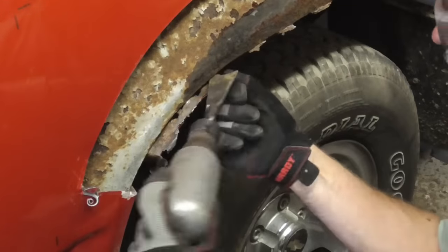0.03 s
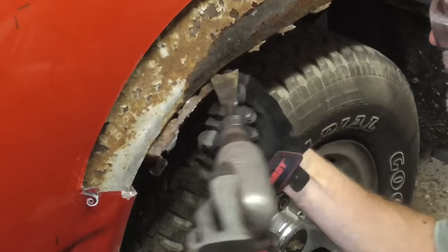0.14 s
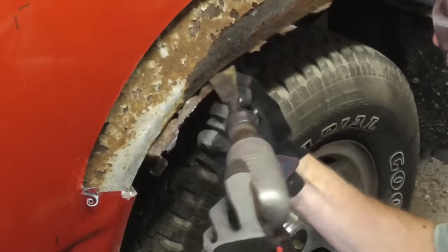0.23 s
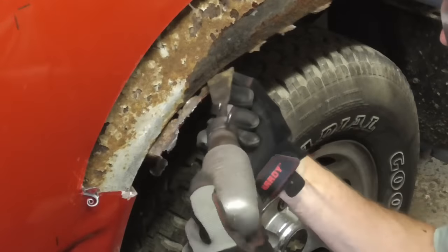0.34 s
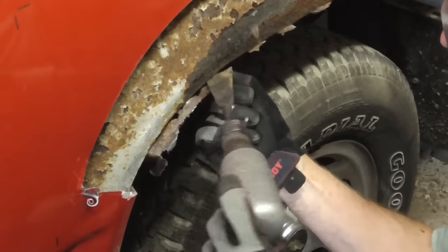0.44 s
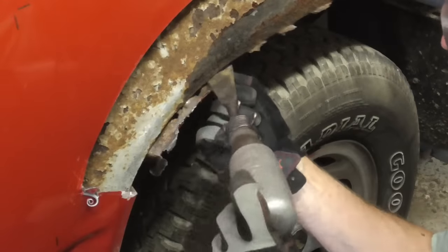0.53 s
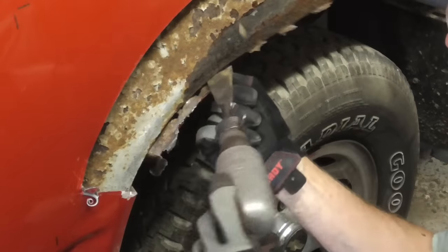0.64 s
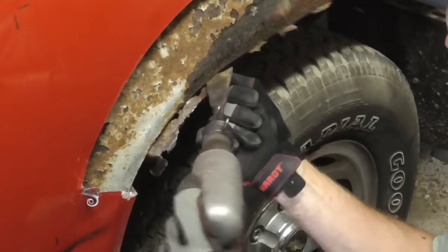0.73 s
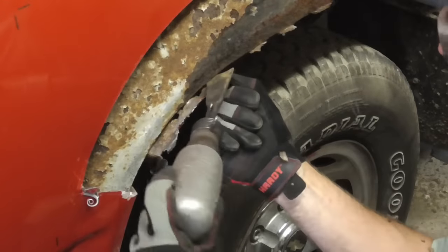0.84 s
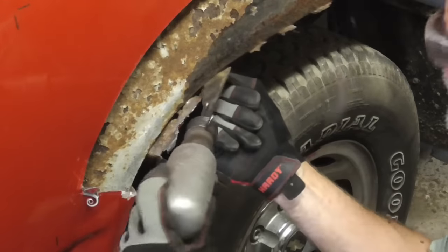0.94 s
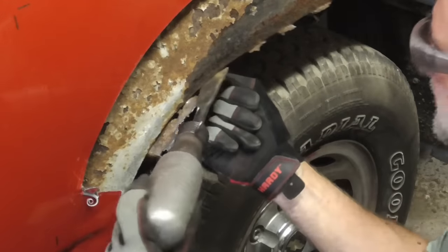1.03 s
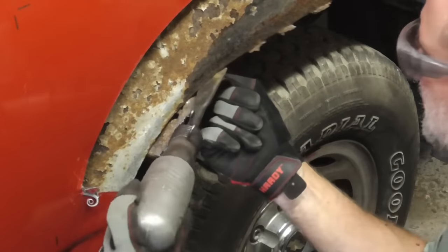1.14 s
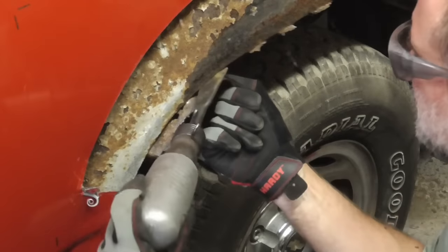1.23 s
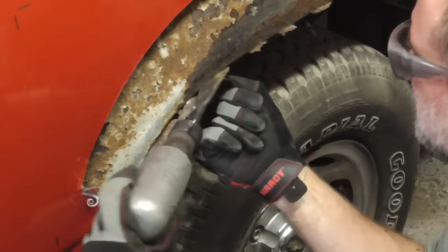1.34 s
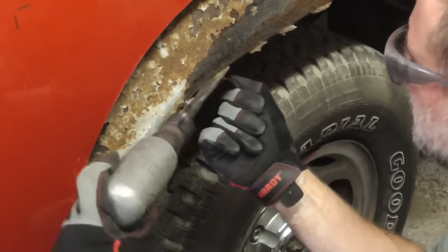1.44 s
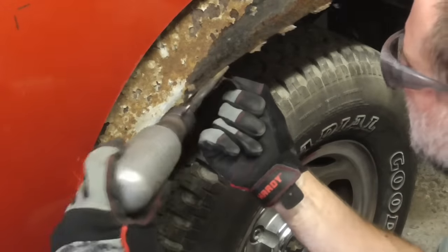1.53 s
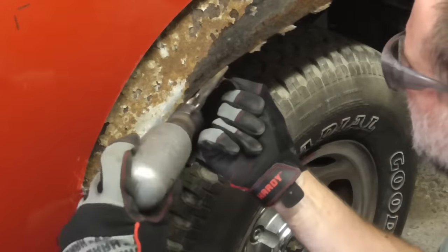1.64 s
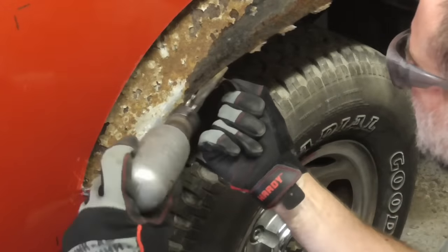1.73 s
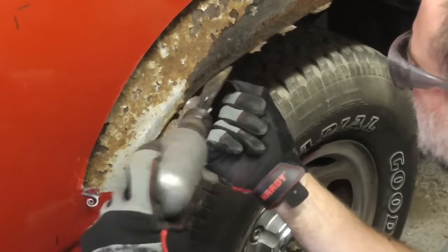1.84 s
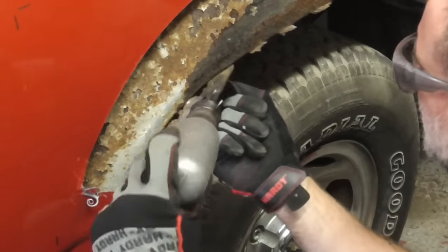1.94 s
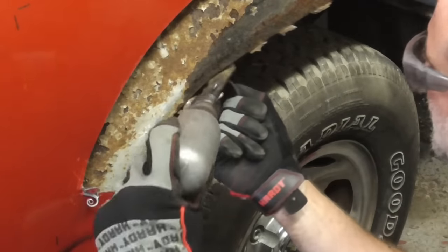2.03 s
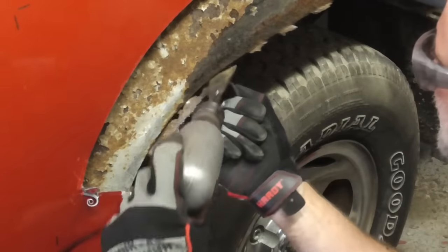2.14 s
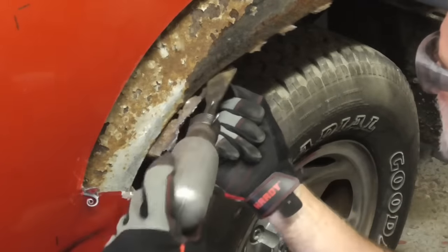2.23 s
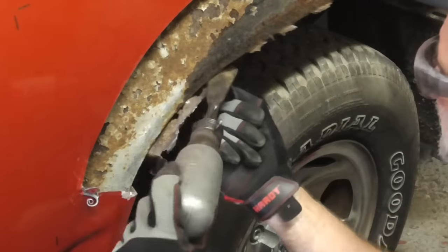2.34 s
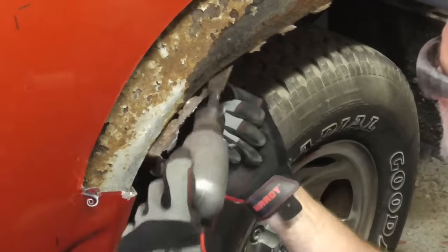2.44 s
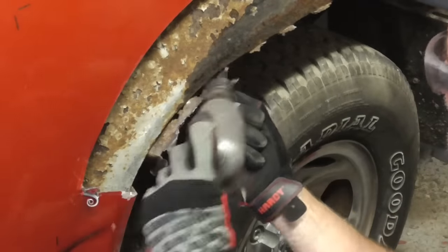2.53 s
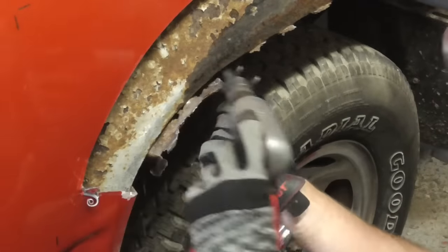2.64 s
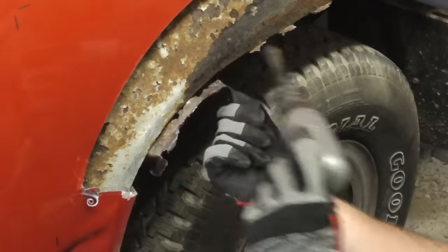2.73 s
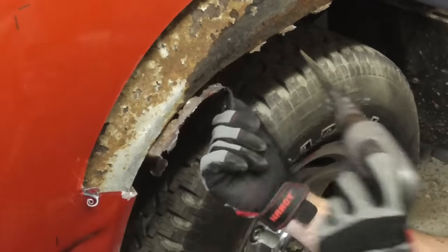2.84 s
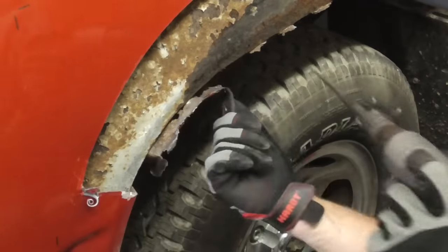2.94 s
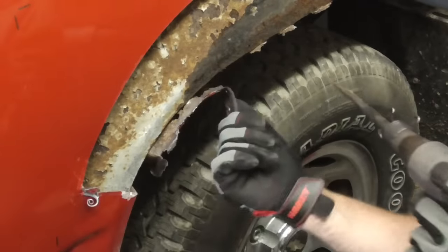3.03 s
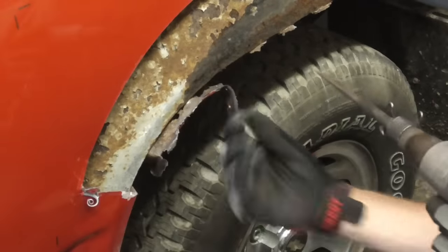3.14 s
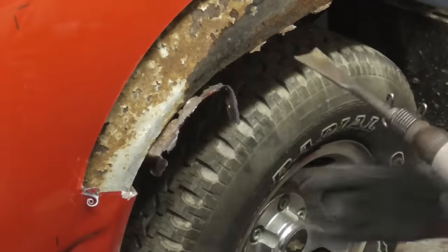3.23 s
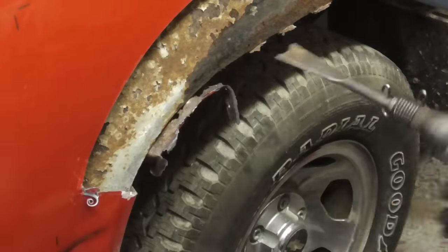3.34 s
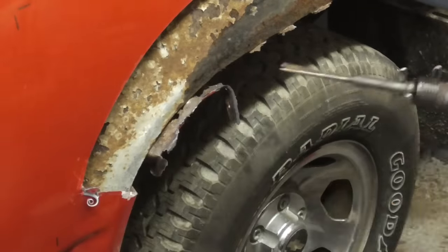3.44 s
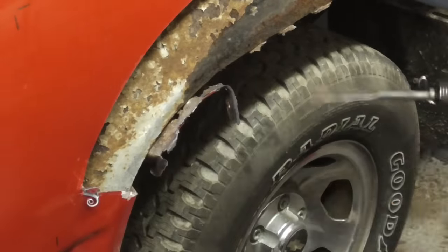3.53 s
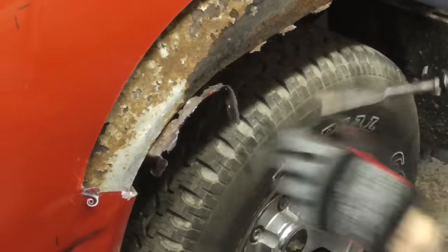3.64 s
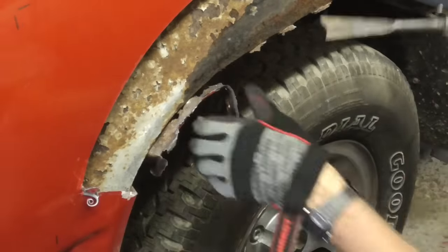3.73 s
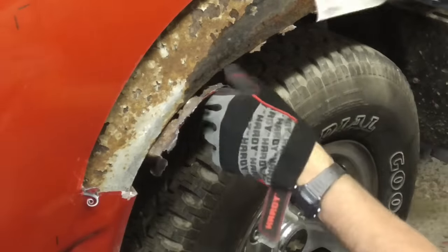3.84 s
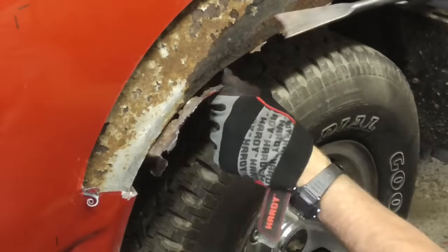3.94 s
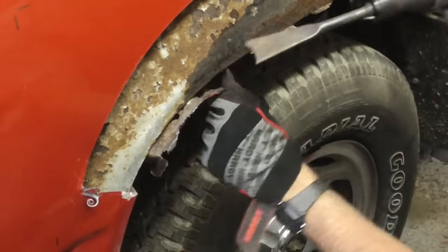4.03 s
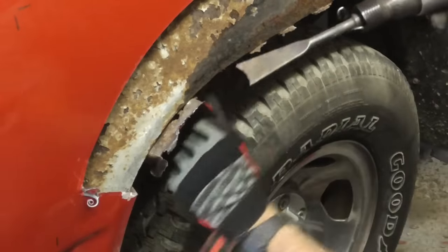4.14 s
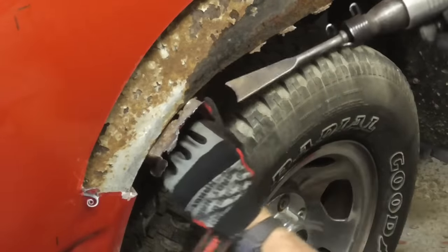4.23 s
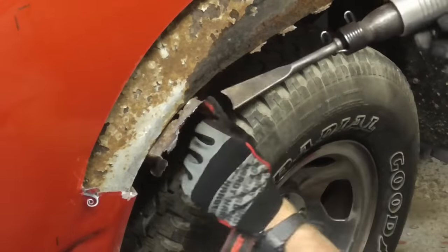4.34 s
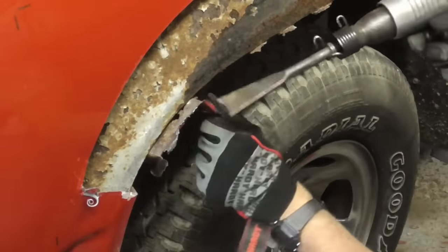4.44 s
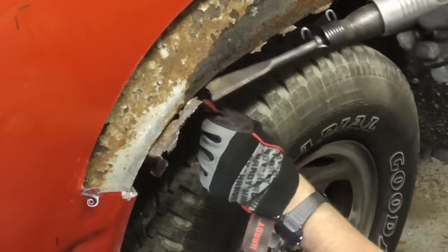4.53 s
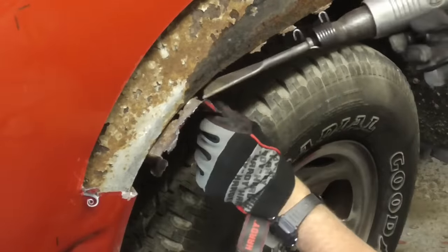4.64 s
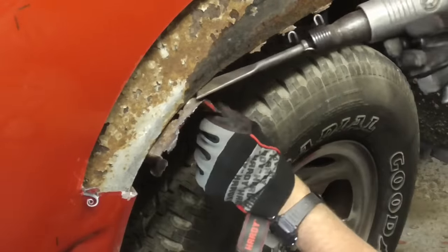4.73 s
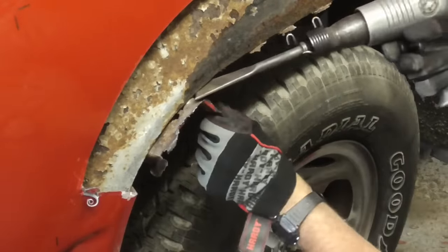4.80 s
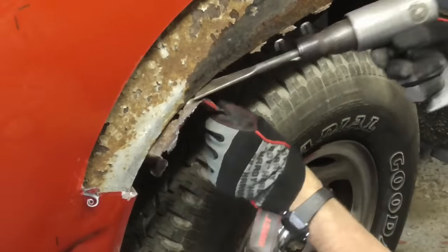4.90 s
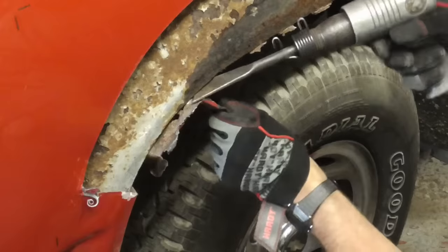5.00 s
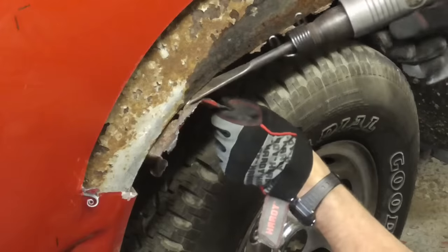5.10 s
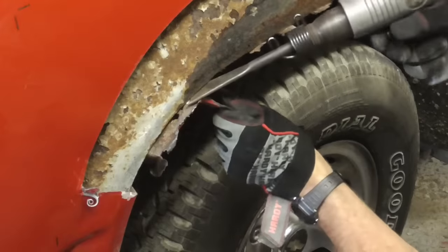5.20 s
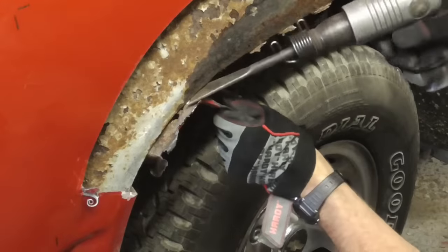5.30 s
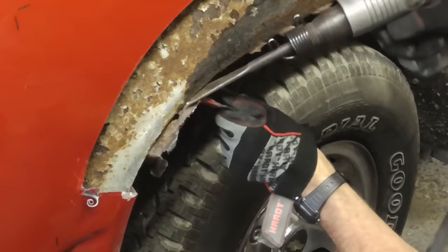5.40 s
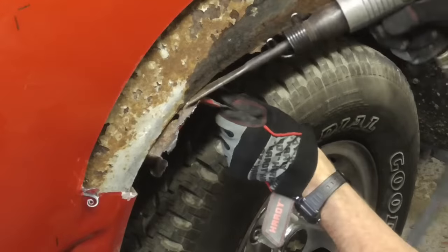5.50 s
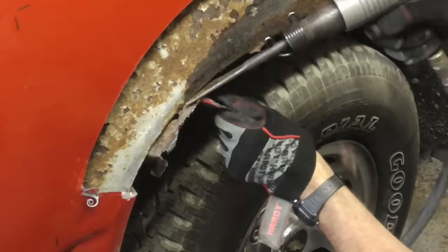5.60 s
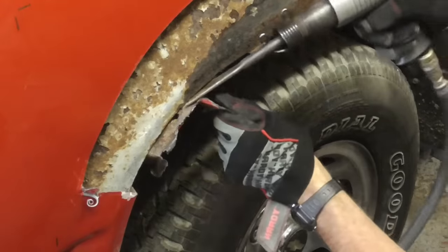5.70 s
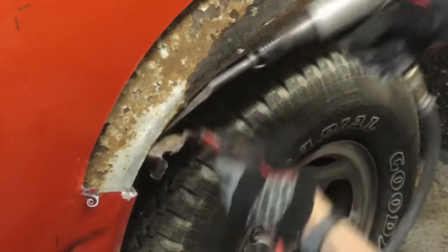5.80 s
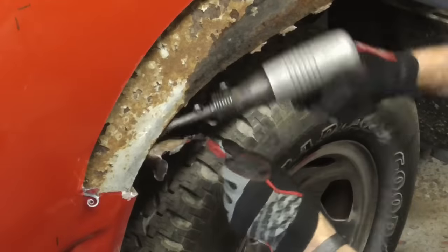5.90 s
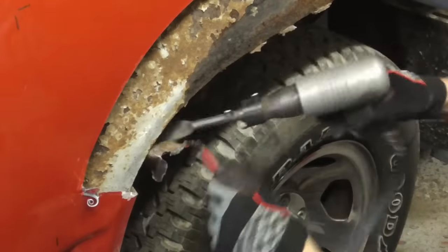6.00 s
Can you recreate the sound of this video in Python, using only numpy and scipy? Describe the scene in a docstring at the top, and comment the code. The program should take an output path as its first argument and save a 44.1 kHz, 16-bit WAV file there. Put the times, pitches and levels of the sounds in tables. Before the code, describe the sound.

Close stereo pickup over a low workshop hum. A compressed-air hammer rattles very fast against hollow, thin sheet metal: short, short, then long, ending in ringing steel. A quieter stretch holds flaky ticks, soft glove-like friction, light chisel clinks and duller panel knocks. A short low groan and air spits lead into a quick burst and a longer one, with walls answering.

```python
"""Soft friction noise rustles in uneven grains and knocks sound on a rusted car wing in a humming workshop.
Two short bursts and a long one follow, about forty blows a second: each vents a hiss from the air hammer,
booms and clangs in the sheet (noise and decaying modes) and rings the chisel (decaying sines).
The chisel breaks free ringing; then rust ticks and scrapes, it clinks and taps, and the levered panel groans.
Two last bursts end it; the walls answer throughout, over low noise and two fuzzy motor tones."""
import sys
import numpy as np
from scipy import signal
from scipy.fft import rfft, irfft, next_fast_len
from scipy.io import wavfile
from scipy.ndimage import uniform_filter1d, minimum_filter1d, map_coordinates

SR = 44100
rng = np.random.default_rng(int(sys.argv[2]) if len(sys.argv) > 2 else 0)


def log_audio(samples):
    """Write samples as a 16-bit WAV file to the path given in sys.argv[1]."""
    # one column per channel
    frames = np.atleast_2d(samples).T
    # limit to full scale, then quantise
    limited = np.clip(frames, -1, 1)
    pcm = np.round(limited * 32767).astype(np.int16)
    wavfile.write(sys.argv[1], SR, pcm)


N = 267246
SPAN = SR // 3  # longest sound of one hit, in samples
OFF_DB = -200


def hammer():
    """Every hit lets out noise, most shake the sheet; driven blows and end-on clinks ring the chisel."""
    hits = all_hits()
    driven = hits["likeness"] > 0
    # the exhaust port stays open for a while after a driven blow
    hold = 1.2 * hits["rise_s"] + .0135 * driven
    air = exhaust(hits, driven, hold)
    metal = sheet(hits, driven, hold)
    rings = hits[driven | (hits["end_on"] > 0)]
    return air + metal + chisel(rings["start_s"], rings["ring_db"], rings["end_on"], rings["contact"])


# trigger pulls, one list each; the pace wanders in the long one: start_s, blows since the first
PULL_STROKES = [
    [(.3895, 0), (.4811, 4), (.5577, 7)],
    [(.697, 0), (.7895, 4), (.8807, 8), (.9496, 11)],
    [(1.071, 0), (1.1933, 5), (1.3192, 10), (1.6795, 24), (2.0311, 38), (2.3959, 53), (2.7499, 67)],
    [(5.271, 0), (5.3462, 3), (5.3944, 5)],
    [(5.5217, 0), (5.5462, 1), (5.9426, 18), (5.9899, 20)],
]
# one row per pull; at its last blow the exhaust weakens and the sheet is let go:
# exhaust_db, likeness of a blow to the last (0-1), last_exhaust_drop_db, last_boom_rise_db
PULL_LEVELS = [(-22, 0.87, 17, 4), (-22, 0.79, 20, 10.5), (-22, 0.79, 2.5, 3.5), (-23, 0.75, 12, 0),
               (-22.5, .95, 1, 3)]
# the cut travels along the wheel arch:
# start_s, boom_db, boom_hz, clang_db, clang_hz, upper_clang_hz, chisel_ring_db
CUT_PATH = [(.41, -15.5, 265, -18.5, 630, 1136, -26), (.53, -19.5, 169, -21, 454, 1147, -34),
            (.72, -15.5, 178, -18, 510, 928, -21), (.84, -16, 184, -19.5, 476, 774, -17),
            (.95, -22, 178, -20, 475, 945, -25), (1.1, -19, 228, -18, 443, 1184, -24),
            (1.28, -16.5, 237, -18.5, 550, 1542, -34), (1.53, -19, 194, -18, 564, 1538, -19),
            (1.701, -20, 234, -18.5, 420, 1506, -27), (1.8, -21, 243, -16.5, 683, 1042, -21),
            (2.07, -21.5, 208, -20, 430, 865, -16.5), (2.4, -23, 211, -21, 420, 703, -13.5),
            (2.55, -26.5, 230, -24.5, 610, 800, -18), (2.759, -28.5, 197, -30.5, 550, 790, -34.5),
            (5.29, -21, 238, -18.5, 484, 748, -34), (5.37, -12.5, 233, -19, 496, 1143, -30),
            (5.42, -24, 210.4, -20, 610, 1214, -34), (5.6, -14, 214, -16.5, 450, 858, -22),
            (5.73, -18, 179, -16.5, 440, 857, -16), (5.9, -19, 173, -16, 440, 860, -16),
            (6, -30, 166, -33, 534, 840, -11)]
AIR_SAG_DB_PER_S, AIR_TREBLE_DB, BLOW_RISE_S = 2, 4, 0.0011
# the chisel seats: the first blows move the sheet this much less
SEAT_S, SEAT_BOOM_DB, SEAT_CLANG_DB = 0.025, 8.5, 4.5
# the chisel breaks free and the trigger eases: the body of the exhaust fades
BREAK_OUT_S, BREAK_OUT_DB_PER_S = 2.45, 15
# in a burst a ring this weak means full contact, this strong none
BURIED_DB, FREE_DB = -22.5, -11


def driven_blows():
    """The piston's blows, paced by the strokes; panel pitches and levels follow the cut."""
    rows = []
    when, *cut = np.transpose(CUT_PATH)
    for strokes, (pull_db, alike, weak_db, free_db) in zip(PULL_STROKES, PULL_LEVELS):
        s, count = np.transpose(strokes)
        for at in np.interp(np.arange(count[-1] + 1), count, s):
            boom, low, clang, high, upper, ring = [np.interp(at, when, c) for c in cut]
            contact = (FREE_DB - ring) / (FREE_DB - BURIED_DB)
            unseated, last = np.exp(-(at - s[0]) / SEAT_S), at == s[-1]
            fade = BREAK_OUT_DB_PER_S * (at - BREAK_OUT_S) if s[0] < BREAK_OUT_S < at else 0
            air = pull_db - AIR_SAG_DB_PER_S * (at - s[0]) - weak_db * last - fade
            treble = AIR_TREBLE_DB + .8 * fade
            boom += free_db * last - SEAT_BOOM_DB * unseated
            clang -= SEAT_CLANG_DB * unseated
            # no two blows are quite alike in time or strength
            late, a, b, c, d = rng.standard_normal(5)
            start = at + 0.001 * (1 - alike) * late
            rows.append((start, air + .7 * a, treble, boom + 0.93 * b, low, clang + 0.64 * c, high,
                         BLOW_RISE_S, upper, ring + 1.9 * d, 1, alike, 0, contact))
    return rows


# the valve spits just before a pull: start_s, level_db, rise_s
VALVE_PUFFS = [(0.67, -18.5, 0.004), (1.0524, -21.5, 0.0042), (5.2283, -23, 0.0055), (5.2401, -16, 0.0042),
               (5.4918, -26, .005), (5.5078, -18.5, .004)]
# every puff: treble_db, boom_db over the puff, boom_hz, clang_db over the puff, clang_hz
PUFF_BODY = (8, -6, 225.5, -9, 477)
# knocks on the panel, some followed by a late swell of boom, with a misfired blow and one late hammer blow:
# start_s, crack_db, treble_db, boom_db, boom_hz, clang_db, clang_hz
PANEL_KNOCKS = [(0.0684, -50, -12, -45, 252, -48.5, 583), (0.15, -53.5, 4, -42.5, 205, -53.5, 487),
                (0.2062, -56, -16, -47, 270, -42.5, 536), (0.3083, -38, -23, -23, 236, -29, 431),
                (.3735, -16, 1, -17.5, 270, -21.5, 430), (3.333, -54, 0.5, -44, 143, -49, 523),
                (3.359, -66, -13.5, -42, 175, -49.5, 485), (4.0892, -58, -6, -34.5, 251, -52, 400),
                (4.2887, -22, -1, -21, 256, -19, 1180), (4.764, -32.5, -13, -22.5, 271, -27.5, 427),
                (4.7874, -58, -13, -24, 239, -47, 417), (4.879, -20, -16, -30.5, 250, -24.5, 434),
                (4.929, -24, -17, -28, 253.2, -17, 440), (4.9868, -52, -11, -22, 242, -37, 520),
                (5.05, -44, -17, -25.5, 248, -32, 426), (5.111, -23.5, -22, -21, 164, -16, 486),
                (5.1343, -33, 7, -10.5, 250, -35.5, 500), (5.225, -27.5, -6, -31, 244, -29.5, 633),
                (5.4185, -30, -4, -17, 210, -22, 610)]
KNOCK_RISE_S = 0.002
# rust flakes tick (short rise) and scrape (long rise): start_s, level_db, treble_db, rise_s
RUST_TICKS = [(0.2864, -47, -15.5, 0.0018), (3.085, -61, 1, .0004), (3.1109, -56, 11.5, 0.00026),
              (3.205, -64, 6.5, 0.00049), (3.2915, -57, 6, .0006), (3.491, -49, -6, 0.0007),
              (3.543, -58, 4, 0.00044), (3.5561, -46, -11, 0.00054), (3.653, -42.5, 0, 0.0031),
              (3.68, -47, 2, 0.0059), (3.733, -32.5, 9, 0.0044), (3.7677, -47, 12, 0.0018),
              (4.579, -48, 6, 0.00083), (4.597, -40.5, 6, 0.0024), (4.6637, -50, -20, 0.0022)]
# the faint thud under every tick: boom_db, boom_hz, clang_db, clang_hz
TICK_THUD = (-53, 201, -67.5, 500)
# the chisel rings freely, breaking out of the cut or loose in its spring, or dully when laid on the panel:
# start_s, ring_db, crack_db, end-on share (0-1; at 0 only the crack sounds), contact with the sheet (0-1)
CHISEL_CLINKS = [(0.3732, -29, -18, 0, 1), (2.574, -11, -36, 1, 0.2), (2.603, -12, -35, 0.9, 0),
                 (2.65, -11, -35, 0.83, 0.14), (2.701, -12, -28, 0.98, 0.15), (2.797, -27, -42, 1, 0),
                 (3.971, -45, -32, 0.03, 0.2), (3.978, -39, -32, 0.05, .3), (4.005, -51, -44, 0.27, .3),
                 (4.056, -38, -24, 0.03, 0.05), (4.128, -62, -48, 0.2, 0.4), (4.163, -35, -29, 0.01, .1),
                 (4.185, -44, -43, 0, 0.4), (4.2891, -30, -33, 0.32, 0.7), (4.8805, -30, -28, .02, .9),
                 (4.9295, -33, -28, .02, 1), (5.1114, -36, -38, 0, 1)]


def loose_hits():
    """Valve puffs, knocks, rust ticks, chisel clinks and a stray late blow, each placed singly."""
    treble, boom, low, clang, high = PUFF_BODY
    rows = [(s, db, treble, db + boom, low, db + clang, high, rise, 0, OFF_DB, 0, 0, 1, 0)
            for s, db, rise in VALVE_PUFFS]
    rows += [(*knock, KNOCK_RISE_S, 0, OFF_DB, 0, 0, 0, 0) for knock in PANEL_KNOCKS]
    rows += [(*tick, *TICK_THUD, rise, 0, OFF_DB, 0, 0, 1, 0) for *tick, rise in RUST_TICKS]
    rows += [(s, crack, 0, OFF_DB, 1, OFF_DB, 1, .0007, 0, ring, end_on, 0, 1, touch)
             for s, ring, crack, end_on, touch in CHISEL_CLINKS]
    return rows


def all_hits():
    """All that strikes or spits, in order of time, with one named column per property."""
    names = ("start_s crack_db treble_db boom_db boom_hz clang_db clang_hz "
             "rise_s upper_hz ring_db end_on likeness thin contact")
    rows = np.array(sorted(loose_hits() + driven_blows()))
    return np.array([tuple(row) for row in rows], dtype=[(name, float) for name in names.split()])


# colour of the escaping air and of every crack: pitch_hz, level_db per Hz
EXHAUST_COLOUR = [(880, -25), (1500, -7.5), (1780, -11.5), (2220, -13.5), (2790, -13.5), (4290, -8),
                  (6660, -11), (8810, -7.5), (10900, -6), (13700, -2), (15400, -8), (15900, -22.5),
                  (16400, -67.5)]
# the piston bounces back: delay_s after the blow, hiss_db over the exhaust, t60_s
PISTON_REBOUND = (.0055, 2, .03)
THIN_HZ = 2850  # the hiss of puffs, ticks and clinks falls away below
THIN_T60_PER_RISE, THIN_T60_S = 23, 0.0041  # thin sounds that start slowly also die slowly


def exhaust(hits, driven, hold):
    """Air rushing out, or the crack of a hit: shaped noise whose treble can die sooner than its body."""
    s, rise, crack_db = hits["start_s"], hits["rise_s"], hits["crack_db"]
    thin = hits["thin"] > .5
    clinks = hits["contact"] + hits["end_on"] > 0
    life = np.where(thin, THIN_T60_S + THIN_T60_PER_RISE * rise + .008 * clinks, .06 + .06 * driven)
    vent = np.where(driven, .65, 1) * hold
    body_db = crack_db + 4.5 + .8 * driven
    full, slim = [shaken(s[k], body_db[k], rise[k], vent[k], 0, life[k], size=SPAN // 2)
                  for k in (~thin, thin)]
    slim = filtered(slim, lambda hz: 1 / np.sqrt(1 + (THIN_HZ / (hz + 1)) ** 6))
    dull = coloured(full + slim, EXHAUST_COLOUR)
    bright_db = crack_db + hits["treble_db"] + 1.2 * driven
    bright_life = np.minimum(life, .035 + .04 * driven)
    bright = coloured(shaken(s, bright_db, rise, vent, 0, bright_life, size=SPAN // 4), EXHAUST_COLOUR)

    def above(hz):
        """Share of the power that belongs to the treble, crossing over at 8 kHz."""
        return 1 / (1 + (8000 / (hz + 1)) ** 6)

    air = filtered(dull, lambda hz: np.sqrt(1 - above(hz))) + filtered(bright, lambda hz: np.sqrt(above(hz)))
    after, over_db, fade = PISTON_REBOUND
    bounce = shaken(s[driven] + after, crack_db[driven] + over_db, rise[driven], .002, 0, fade, size=SPAN // 4)
    return roughened(air + coloured(bounce, EXHAUST_COLOUR))


GRAIN_DB, GRAINS_PER_S, PATCH_DB = 1.2, 700, 2


def roughened(x):
    """Rust and rattle roughen the hiss: uneven grains in time and short patches of colour."""
    z = signal.stft(x, nperseg=128)[2]
    field = uniform_filter1d(rng.standard_normal(z.shape[1:]), 4, 0)
    field = uniform_filter1d(field, 8, 1)
    patches = amp(PATCH_DB * unit(field))
    patchy = signal.istft(z * patches, nperseg=128)[1][:, :N]
    grain_at = np.arange(N) / SR * GRAINS_PER_S
    grain = amp(GRAIN_DB * map_coordinates(rng.standard_normal(8000), [grain_at]))
    return patchy * unit(grain) / np.sqrt(np.mean(patches ** 2))


# large panel areas: pitch_hz, level_db per Hz
BOOM_COLOUR = [(15, -86.5), (25, -37.5), (48, -57.5), (86, -13), (102, -13), (193, 3), (237, 4), (263, 0.5),
               (400, -28.5), (520, -19.5), (880, -120)]
# the lip of the wheel arch: pitch_hz, level_db per Hz
CLANG_COLOUR = [(180, -73), (300, 1.5), (424, 2), (467, 3), (558, 3), (832, 0), (909, -3), (1000, -0.5),
                (1290, -4.5), (1490, -10), (1770, -16.5), (2230, -13.5), (2500, -18.5), (3250, -39.5),
                (5500, -120)]
# each driven blow: pitch_hz, level_db over the boom, lead_s, rise_s, t60_s, db it takes from the boom
BLOW_THUMP = (196, 2.5, .0055, .003, .06, 4.5)
PANEL_HZ = 120  # the wing radiates little of the thump and push below


def sheet(hits, driven, hold):
    """The wing booms and its arch clangs: noise for many modes, sines for the strongest, a thump per blow."""
    s, rise, alike, clang_db = hits["start_s"], hits["rise_s"], hits["likeness"], hits["clang_db"]
    blow = hits[driven]
    thump_hz, thump_db, lead, swell, short, taken_db = BLOW_THUMP
    thump = tones(blow["start_s"] - lead, blow["boom_db"] + thump_db, np.full(len(blow), thump_hz),
                  rise=swell, t60=short, stray=.2 * (1 - blow["likeness"]))
    boom_db = hits["boom_db"] - taken_db * driven
    boom = shaken(s, boom_db - 7.5, rise + 0.00058, hold, alike, t60=0.23)
    clang = shaken(s, clang_db - 3.0, 0.15 * rise, 0.38 * hold, alike, t60=0.27)
    metal = coloured(boom, BOOM_COLOUR) + coloured(clang, CLANG_COLOUR)
    unlike = driven * (1 - alike)
    metal += tones(s, boom_db - 7.5, hits["boom_hz"], rise=0.0026, t60=0.22, stray=.15 * unlike)
    metal += tones(s, clang_db - 6, hits["clang_hz"], rise=0.0022, t60=.1, stray=.16 * unlike)
    metal += tones(blow["start_s"], blow["clang_db"] - 7, blow["upper_hz"],
                   rise=.001, t60=0.11, stray=.14 * unlike[driven])
    push = thump + pops(blow["start_s"] + 0.0006, blow["crack_db"] + 12, width=0.0005)
    return metal + filtered(push, lambda hz: 1 / np.sqrt(1 + (PANEL_HZ / (hz + 1)) ** 8))


def tones(times, db, hz, rise, t60, stray):
    """One mode of the wing, its pitch straying from hit to hit; left and right are out of step."""
    out, t = np.zeros((2, N + SPAN)), np.arange(SPAN) / SR
    turn = 0.17 * map_coordinates(rng.standard_normal(30), [times * 4])[:, None, None] * [[1], [-1]]
    pitches = hz * (1 + stray * rng.standard_normal(len(hz)))
    for s, level, pitch, lag in zip(times, db, pitches, turn):
        swing = np.sin(2 * np.pi * pitch * t + lag)
        out[:, round(s * SR):][:, :SPAN] += amp(level - 60 * t / t60) * (1 - np.exp(-t / rise)) * swing
    return out[:, :N]


def pops(times, db, width):
    """The push of air as the exhaust port opens, with a suction before and after."""
    spikes = np.bincount(np.round(times * SR).astype(int), amp(db), N)
    u = np.arange(-200, 201) / SR / width
    return np.convolve(spikes, (1 - 0.17 * u - u * u) * np.exp(-u * u / 2), "same")


# modes of the bar: pitch_hz, level_db, t60_s when free, change_db struck end-on, change_db laid on the panel
CHISEL_MODES = [(3220, -8, .09, -22, 2), (4500, -18, .07, -8, 17), (5600, -3, .11, -18, -11),
                (8740, -9, .13, -13, -8), (9100, -4, .12, -7, -4), (10400, -9, .06, -10, -5),
                (12780, -2, .11, -11, -6), (14050, -4, .14, 1, -11)]
DAMPING, SCATTER = 2.4, 0.033  # full contact: added decay rate, added pitch spread when driven
FLASH, FLASH_S = 3, .01  # extra loudness at the start of a free ring, and how long it lasts


def chisel(times, db, end_on, contact):
    """The bar rings in beating modes; driven end-on it swells, a little flat; contact damps and scatters it."""
    out, t = np.zeros((2, N + SPAN)), np.arange(SPAN // 2) / SR
    hz, level, t60, change, laid = np.transpose(CHISEL_MODES)[:, :, None]
    for s, loud, grip, touch in zip(times, db, np.clip(end_on, 0, 1), np.clip(contact, 0, 1)):
        draw = rng.standard_normal((4, len(CHISEL_MODES), 1))
        spread = .003 + SCATTER * touch * np.maximum(grip, touch ** 2)
        pitch = 2 * np.pi * hz * (1 - .017 * grip + spread * draw[0])
        strength = loud + level + grip * change + touch * (1 - grip) * laid + 2.5 * draw[1]
        decay = amp(strength - 60 * t / t60 * (1 + .5 * grip + DAMPING * touch))
        beating = 1 + (.8 - .45 * grip) * np.sin(.006 * pitch * t + 3 * draw[2])
        modes = decay * beating
        # left and right differ in phase
        ring = [(modes * np.sin(pitch * t + turn)).sum(0) for turn in (0, 0.21 * draw[3])]
        onset = 1 - np.exp(-t / (0.00029 + 0.004 * grip ** 2))
        flash = 1 + FLASH * (1 - grip) * np.exp(-t / FLASH_S)
        out[:, round(s * SR):][:, :len(t)] += ring * onset * flash
    return out[:, :N]


# the panel groans while the chisel is levered under it: start_s, pitch_hz, level_db, third_partial_db
PANEL_GROAN = [(4.975, 165.4, -34, -25), (5.003, 166.5, -26.5, -33), (5.085, 162.5, -35, -47),
               (5.148, 170.7, -13.5, -22), (5.175, 174.4, -17, -23), (5.197, 175.2, -26.5, -26),
               (5.239, 172, -20.5, -48), (5.255, 176, -41, -52)]


def groan():
    """A wavering panel mode and its third partial."""
    s, hz, low_db, high_db = np.transpose(PANEL_GROAN)
    t = np.arange(N) / SR
    turn = 2 * np.pi * np.cumsum(np.interp(t, s, hz)) / SR
    edge = np.clip(np.minimum(t - s[0], s[-1] - t) / 0.0062, 0, 1)
    low = amp(np.interp(t, s, low_db)) * np.sin(turn)
    high = amp(np.interp(t, s, high_db)) * np.sin(3 * turn)
    return np.sqrt(2) * edge * (low + high)  # the levels are rms


# soft friction noise, and valve hiss rising before the first pull, one list per passage: start_s, level_db
RUSTLE_LEVELS = [
    [(0.0, -64), (0.15, -63), (0.34, -68), (0.37, -28)],
    [(2.95, -62.5), (3.106, -75.5), (3.28, -73), (3.9, -60.5), (4.024, -55), (4.144, -60), (4.192, -53),
     (4.252, -46), (4.394, -59), (4.628, -56.5), (4.812, -59), (4.9, -49)],
]
# colour of the rustle: pitch_hz, level_db per Hz
RUSTLE_COLOUR = [(410, -42), (700, -9), (1140, -10), (1250, -8.5), (1840, -20.5), (8760, -20.5),
                 (13300, -22.5), (16000, -44)]


def rustle():
    """Soft friction noise and a rise of valve hiss, both as noise in short uneven grains."""
    t = np.arange(N) / SR
    level = sum(amp(np.interp(t, *np.transpose(rows), left=-120, right=-120)) for rows in RUSTLE_LEVELS)
    grain = amp(3.5 * map_coordinates(rng.standard_normal(400), [t * 60]))
    return level * unit(coloured(grain * rng.standard_normal((2, N)), RUSTLE_COLOUR))


# how long the room's answer lasts: pitch_hz, t60_s
WALL_DECAY = [(150, 0.76), (1000, 0.23), (5000, 0.38), (14000, 0.29)]


def walls(x):
    """Each quarter second of sound gets its own random echo tail, dying at a speed set by frequency, weak in bass."""
    out, step = np.zeros((2, N + 2 * SR)), SR // 4
    for start in range(0, N, step):
        noise = np.array([[1, 0.35], [1, -0.27]]) @ rng.standard_normal((2, SR // 2))
        hz, t, z = signal.stft(noise, SR, nperseg=256)
        tail = signal.istft(z * amp(-60 * t / along(WALL_DECAY, hz)[:, None]), SR, nperseg=256)[1]
        wet = signal.fftconvolve(x[:, start:start + step], tail / np.linalg.norm(tail[0]), axes=1)
        out[:, start + 300:][:, :wet.shape[1]] += wet  # the echo starts 300 samples late
    return filtered(out[:, :N], lambda f: f / np.hypot(f, 140))


# levels of the background: start_s, hum_db, motor_db
HUM_LEVELS = [(0, -50.5, -61), (.3, -49, -81), (2.9, -52, -69), (3.31, -60.5, -78.5), (3.35, -51, -61.5),
              (3.45, -50.5, -68.5), (3.701, -60.5, -87), (4.1, -51, -66), (4.7, -51, -80), (6.06, -42, -84)]
# colour of the hum: pitch_hz, level_db per Hz
SHOP_COLOUR = [(15, -73.5), (25, -33), (96, -17.5), (158, -9.5), (197, -16.5), (580, -26.5), (738, -35.5),
               (1170, -44), (3000, -74), (3900, -99), (6600, -120)]
# a far motor: pitch_hz, half_width_hz, level_db over motor_db
MOTOR_TONES = [(1066, 5, -1.5), (535, 6, 2)]


def workshop():
    """A low unsteady hum of coloured noise with two motor tones, fuzzy as narrow bands of noise."""
    s, hum_db, motor_db = np.transpose(HUM_LEVELS)
    t = np.arange(N) / SR
    sway_db = 1.5 * map_coordinates(rng.standard_normal(60), [t * 8])
    hum = amp(np.interp(t, s, hum_db) + sway_db) * coloured(rng.standard_normal((2, N)), SHOP_COLOUR)
    for hz, width, level in MOTOR_TONES:
        tone = unit(filtered(rng.standard_normal(N), lambda f: np.exp(-((f - hz) / width) ** 2)))
        hum += amp(level + np.interp(t, s, motor_db)) * tone
    return hum


def shaken(times, db, rise, hold, alike, t60, size=SPAN):
    """Noise bursts that hold, then die; a blow on the same spot repeats part of the last one's pattern."""
    out, t, pattern = np.zeros((2, N + SPAN)), np.arange(size) / SR, np.zeros((2, size))
    for s, level, up, on, share, life in np.broadcast(times, db, rise, hold, np.clip(alike, 0, 1), t60):
        pattern = share * pattern + np.sqrt(1 - share ** 2) * rng.standard_normal((2, size))
        shape = (1 - np.exp(-t / up)) ** 2 * amp(level - 60 * np.maximum(t - on, 0) / life)
        out[:, round(s * SR):][:, :size] += pattern * shape
    return out[:, :N]


# how alike left and right are: pitch_hz, likeness (-1 to 1)
STEREO_LIKENESS = [(60, 0.15), (130, 1), (290, 0.87), (640, 0.74), (1410, 0.55), (3100, 0.82), (6820, 0.4),
                   (15000, 0.4)]


def coloured(pair, spectrum):
    """Two white signals become a stereo pair of this spectrum and the same power."""
    grid = np.linspace(0, SR / 2, 4096)
    norm = np.sqrt(np.mean(amp(along(spectrum, grid)) ** 2))

    def spread(hz):
        """Spectrum shared between mid and side."""
        turn = np.arccos(np.clip(along(STEREO_LIKENESS, hz), -1, 1)) / 2
        return amp(along(spectrum, hz)) / norm * [np.cos(turn), np.sin(turn)]

    mid, side = filtered(pair, spread)
    return np.array([mid + side, mid - side])


def filtered(x, response):
    """x times a response of frequency."""
    m = next_fast_len(N + SR // 2)
    return irfft(rfft(x, m) * response(np.fft.rfftfreq(m, 1 / SR)), m)[..., :N]


def along(points, hz):
    """Values read off (Hz, value) points on a log axis."""
    f, v = np.transpose(points)
    return np.interp(np.log(hz + 1), np.log(f + 1), v)


def amp(db):
    """Gain of a level in dB."""
    return 10 ** (np.asarray(db) / 20)


def unit(x):
    """Scaled to rms 1."""
    return x / np.sqrt(np.mean(x ** 2) + 1e-20)


def limited(x, top, hold_s):
    """Gain drops just ahead of any peak over top and returns after a short hold."""
    hold = round(hold_s * SR)
    needed = np.minimum(1, top / (np.abs(x).max(0) + 1e-9))
    return x * uniform_filter1d(minimum_filter1d(needed, hold), hold // 2)


def scene():
    """The tool and the groaning panel, their echo and the background."""
    tool, low = hammer(), groan()
    echo = amp(-3) * walls(tool + amp(-6.0) * low)
    return tool + low + echo + workshop() + rustle()


# colour difference of the channels: pitch_hz, left_minus_right_db
CHANNEL_LEAN = [(130, -1), (640, 0.5), (1400, -1.5), (5000, 0), (14000, -3)]
TOP_HZ = 16200  # steep upper edge of the band


def record(dry):
    """The channels differ in colour and lose the deep bass; a limiter holds the peaks; the band is limited."""
    def channel(hz):
        """Half the lean up on the left, half down on the right, with a bass cut at 70 Hz."""
        return amp(np.outer([.5, -.5], along(CHANNEL_LEAN, hz))) / np.sqrt(1 + (70 / (hz + 1)) ** 4)

    level = limited(filtered(dry, channel), .86, .012)
    return filtered(level, lambda hz: 1 / (1 + (hz / TOP_HZ) ** 120))


dry = scene()
out = record(dry)
log_audio(out)
```